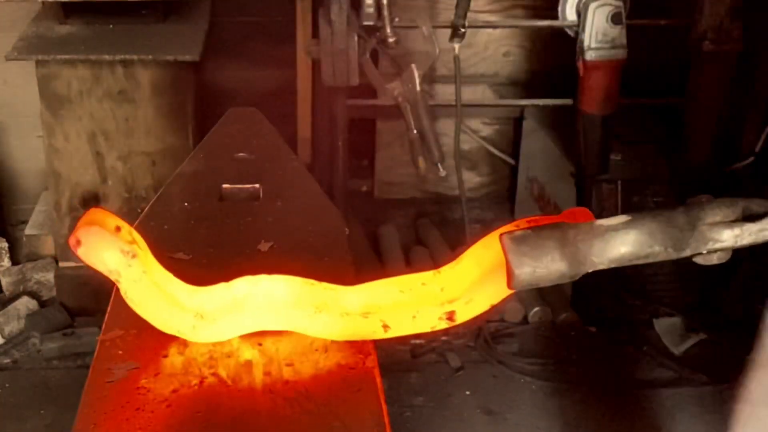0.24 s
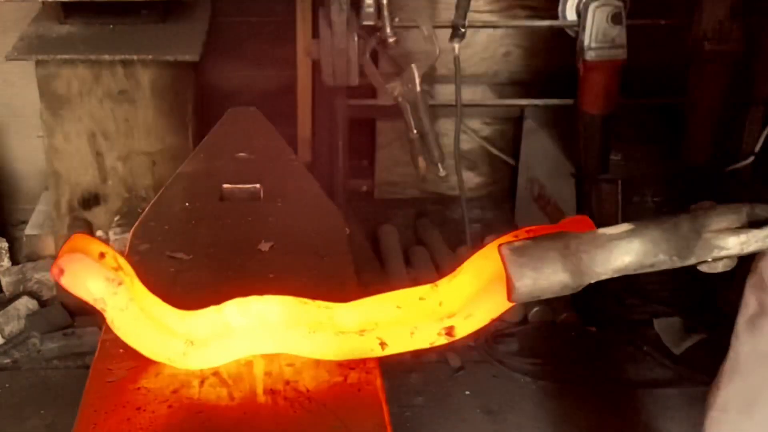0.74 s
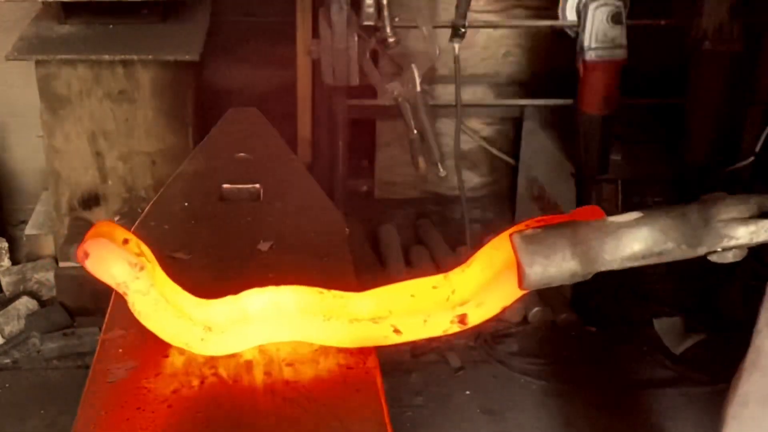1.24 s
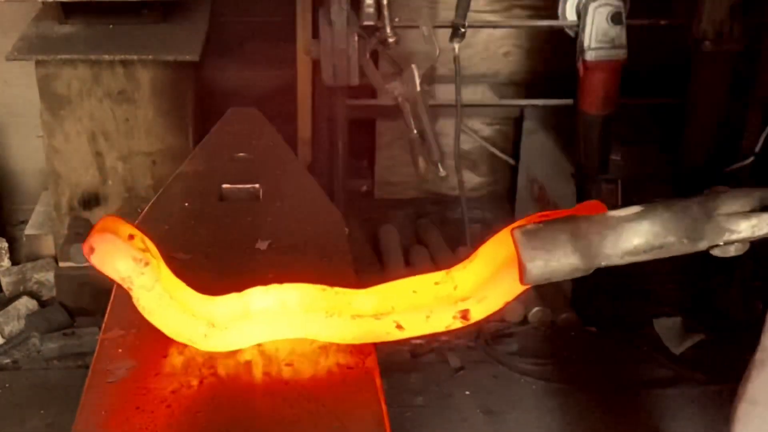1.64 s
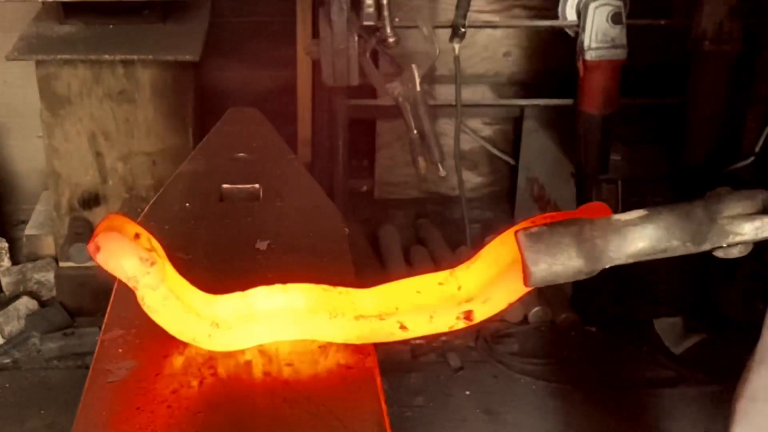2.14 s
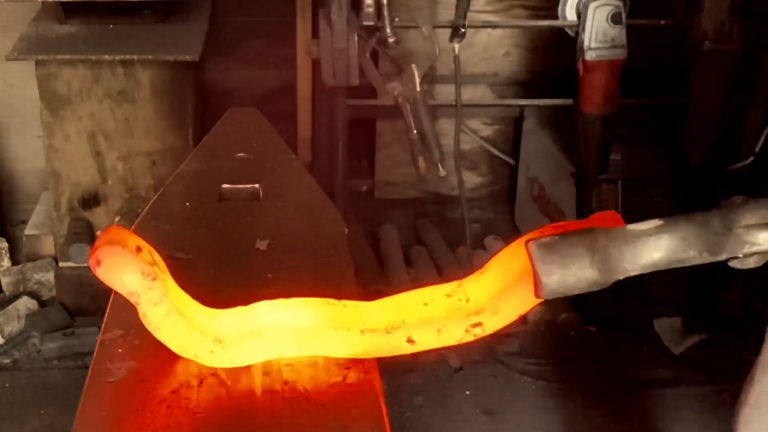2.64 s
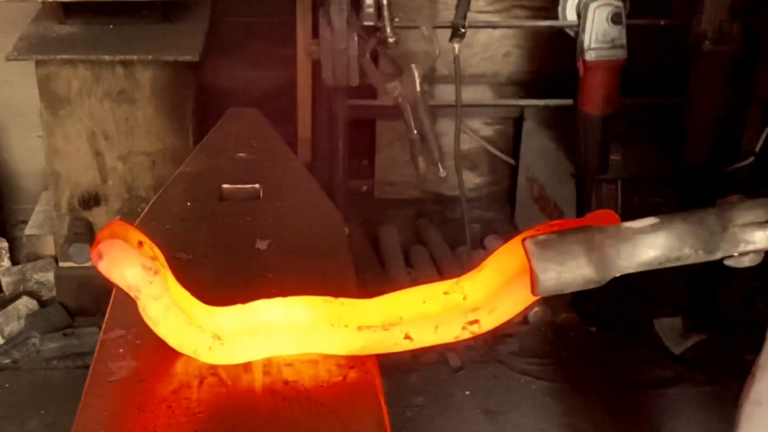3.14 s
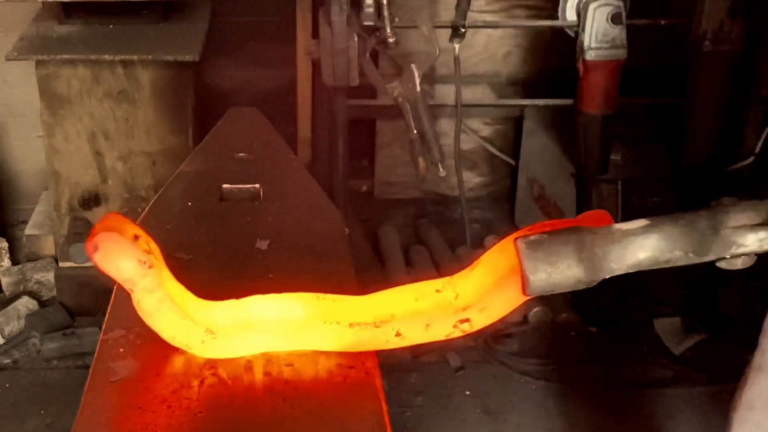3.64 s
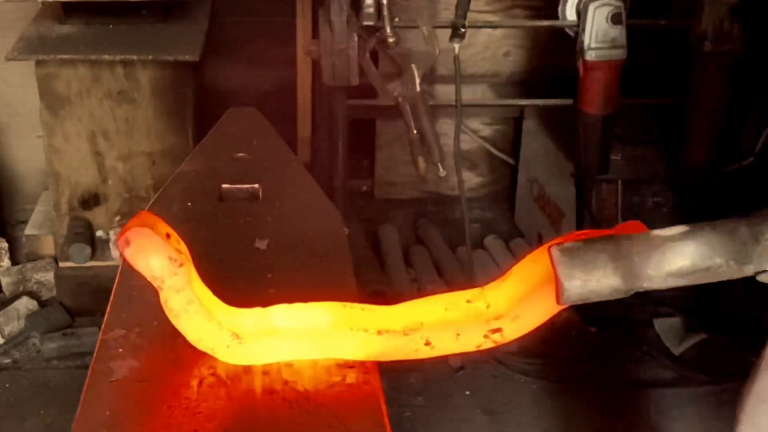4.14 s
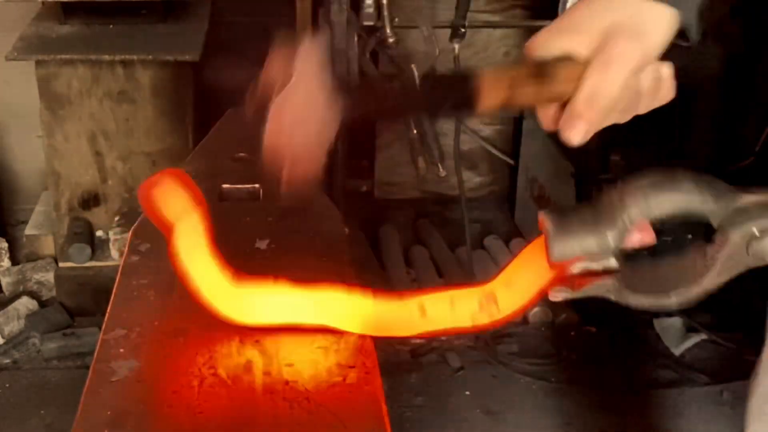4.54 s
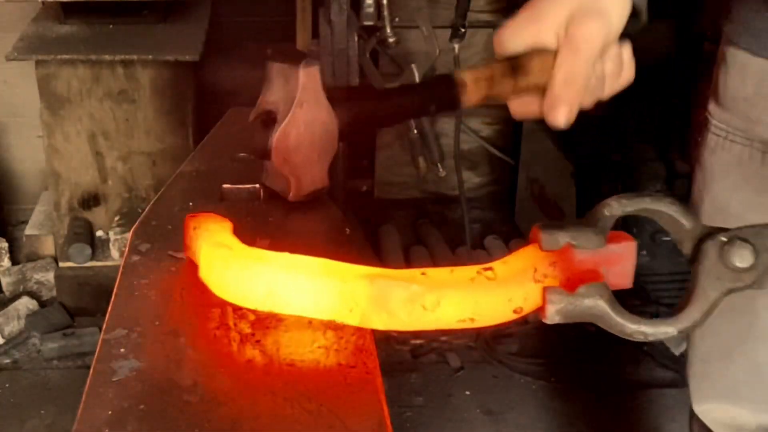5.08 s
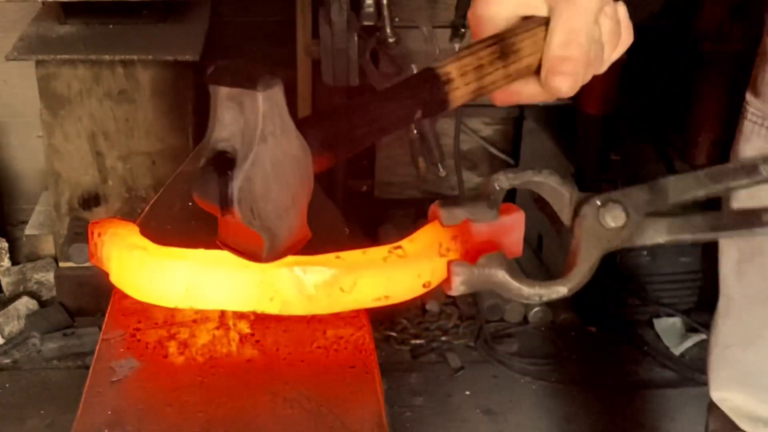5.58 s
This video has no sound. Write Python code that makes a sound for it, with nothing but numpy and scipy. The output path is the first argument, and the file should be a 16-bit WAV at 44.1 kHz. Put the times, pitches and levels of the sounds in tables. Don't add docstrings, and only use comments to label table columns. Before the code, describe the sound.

A low, uneven forge blower roar with soft airy hiss runs throughout a small, briefly echoing workshop, picked up close in stereo. A hammer strikes a hot iron bar on an anvil at about 0.27, 0.78, 1.29, 1.81, 2.31, 2.83, 3.36 and 3.88 s. The first is softer; the others are hard, bright cracks with a dull bar clank and a short ring around 2.3 kHz. The fourth thumps deepest, the fifth has the clearest anvil note, the sixth and eighth are bright with almost no thump. A light tick follows each by roughly 0.1 s. The blower dips after blows and recovers. From 4.39 to 4.8 s the hammer bounces on bare steel, clinking, loudest on the second bounce, then quicker, duller and fainter. A very faint short scrape comes near 5.15 s, small ticks at 5.45 and 5.8 s, with just the blower between.

```python
import sys
import numpy as np
from scipy import signal
from scipy.fft import rfft, irfft, next_fast_len
from scipy.io import wavfile
from scipy.ndimage import uniform_filter1d, map_coordinates

SR = 44100
rng = np.random.default_rng(int(sys.argv[2]) if len(sys.argv) > 2 else 0)


def decibels_to_gain(level_db):
    exponent = np.asarray(level_db, float) / 20
    return 10 ** exponent


def int16_out(signal):
    q = np.round(np.clip(np.atleast_2d(signal).T, -1, 1) * 32767)
    wavfile.write(sys.argv[1], SR, q.astype(np.int16))


N = 256220

# (time [s], peak [dB], stand thump [dB], bright ring [dB], anvil note [dB])
BLOWS = [
    (0.2671, -15, -54, -40, -17.5),
    (0.7832, -5.5, -32, -3, -16),
    (1.294, -6, -18.5, -7, -14.5),
    (1.814, -5.5, -10.5, -2, -12.5),
    (2.3121, -8, -19.5, -7.5, -10.5),
    (2.8266, -5, -60, -3, -15.5),
    (3.3557, -4.5, -16, -3, -11.5),
    (3.8819, -5, -75, -2, -16.5),
]
# (time [s], peak [dB], bright ring [dB], upper tick [dB])
DROPS = [(0.3755, -20, -21, -3), (0.4042, -28, -36, -34), (0.8668, -21.5, -39, -0.5), (1.3822, -19, -15, 4),
         (1.907, -20.5, -62, -7), (2.382, -27.5, -25, 10), (2.906, -28, -34, -3), (3.4566, -22, -36, -5),
         (3.9708, -27, -30, -15), (5.408, -60, -40, 17), (5.453, -32.5, -41, -4.5),
         (5.8054, -39, -29.5, -16)]
# (time [s], peak [dB])
BOUNCES = [
    (4.3924, -12),
    (4.4984, -9.5),
    (4.5721, -12.5),
    (4.6273, -14),
    (4.6748, -16),
    (4.7161, -21.5),
    (4.7476, -25.5),
    (4.7774, -31),
    (4.8058, -51),
]
# (frequency [Hz], level [dB], time to fall 60 dB [s])
ANVIL_NOTE = [(2255, 0, .19), (2328, -4, .15)]
# (frequency [Hz], level [dB], time to fall 60 dB [s])
ANVIL_OVERTONES = [(1566, 0, .12), (1920, -2, .08), (2650, 3, .08), (3090, -2, .15), (4107, -1, .14),
                   (5080, -1, .18), (5620, -4, .14), (6105, 0, .18), (6685, -1, .17), (8020, -3, .13)]
# (frequency [Hz], level [dB], time to fall 60 dB [s])
HAMMER_HEAD = [(8823, 0, .11), (9090, -8, .09), (11700, -17, .08), (12752, -4, .12), (13300, -19, .08),
               (14550, -16, .08)]
# (frequency [Hz], level [dB], time to fall 60 dB [s])
IRON_BAR = [(540, -6, .02), (720, -7, .02), (960, -3, .02), (1040, 0, .025), (1130, -4, .02)]
# (frequency [Hz], level [dB], time to fall 60 dB [s])
FACE_CLICK = [(5340, -4, 0.0062), (7320, 0.5, 0.0076), (11470, -1, 0.0036), (15400, -24, .005)]
# (frequency [Hz], level [dB], time to fall 60 dB [s])
HORN = [(5090, 0, .8), (5160, -3, .5), (3600, -4, .7)]
# (frequency [Hz], level [dB per Hz])
CRACK = [(250, -24), (600, -4.5), (1100, -4.5), (1800, -2), (3000, -2.5), (4500, -10), (6500, -4.5),
         (8800, -7.5), (11000, -12.5), (13000, -14), (15600, -22), (16600, -45)]
# (frequency [Hz], level [dB per Hz])
TICK = [(500, -16.5), (1000, -12.5), (1700, -8), (3000, -10.5), (4200, -8), (5300, -7), (6800, -9.5),
        (8800, -15), (11000, -18.5), (13000, -23), (15600, -35), (16600, -55)]
# (frequency [Hz], side over mid [dB])
ANVIL_WIDTH = [(200, 1), (500, 2), (770, 0.5), (1170, -2), (2700, 0), (4200, 1), (8000, -2)]
# (frequency [Hz], time to fall 60 dB [s])
WORKSHOP = [(200, 0.4), (1000, 0.21), (3000, 0.17), (8000, 0.19), (14000, 0.12)]
# (time [s], level [dB], length [s])
SWAYS = [(0.51, -54, 0.14), (0.687, -42, .1), (1.481, -34, 0.069), (1.984, -33, .16), (5.32, -42, 0.23)]
# (frequency [Hz], level [dB per Hz])
ROAR = [(15, -69.5), (25, -33), (48, -16.5), (151, -8.5), (189, -13), (232, -1), (285, -15.5), (316, -5),
        (422, -16), (555, -7), (659, -21.5), (718, -14), (1500, -47), (1950, -81), (3300, -120)]
# (frequency [Hz], level [dB per Hz])
HISS = [(700, -9.5), (1200, -4), (1800, -12.5), (2310, -2), (2970, -7), (3650, -15.5), (3800, -16),
        (7700, -17.5), (9300, -20.5), (11000, -26.5), (13000, -28.5), (15700, -28), (15850, -68)]
# (frequency [Hz], width [Hz], boost [dB])
DUCT = [(239, 8.7, 4.5), (356.3, 20, 5.5), (394, 26.5, 10.5), (488, 48, 6.5), (537.5, 9.2, 10.5),
        (2264, 30, 11), (2420, 130, -4), (2980, 88, 10.5), (3185, 16.5, 15), (3416, 31, 14.5),
        (3576, 16, 18.5)]
# (time [s], level [dB])
ROAR_LEVEL = [(0.0, -36.5), (0.39, -37.5), (0.58, -36), (0.97, -38.5), (1.16, -33.5), (1.33, -40.5),
              (1.7, -34.5), (1.83, -36.5), (2.22, -36), (3.03, -39.5), (3.15, -38.5), (3.48, -38.5),
              (4.53, -36), (5.47, -37.5), (5.81, -34.5)]
# (frequency [Hz], likeness [-1 to 1])
LIKENESS = [(40, 1), (92, 0.39), (210, 0.86), (330, 0.57), (500, -0.18), (770, -0.24), (1170, -0.034),
            (2700, -0.043), (8000, 0.021)]


def anvil():
    pre = SR // 40
    t = (np.arange(SR * 3 // 5) - pre) / SR
    short = t[:SR // 4]
    near, far = np.zeros((2, 2, N + SR))

    for s, db, thump_db, bright_db, note_db in BLOWS:
        start = round(s * SR) - pre
        near[:, start:start + len(short)] += decibels_to_gain(db) * blow(short, db, thump_db, bright_db, note_db)
        stand_and_horn = np.array([decibels_to_gain(thump_db + 16) * thump(t), decibels_to_gain(-37.5) * ring(HORN, t, 1.6)])
        far[:, start:start + len(t)] += decibels_to_gain(db) * stand_and_horn

    for s, db, bright_db, upper_db in DROPS:
        start = round(s * SR) - pre
        sound = tap(short, bright_db, upper_db, ring_db=-3.5, clang_db=-6.5, snap_db=17.5, t60=0.019,
                    overtones_db=-19)
        near[:, start:start + len(short)] += decibels_to_gain(db) * sound

    for k, (s, db) in enumerate(BOUNCES):
        start = round(s * SR) - pre
        sound = tap(short, -13 - 3.5 * k, -4 - 2 * k, ring_db=2.5, clang_db=-0.3, snap_db=7, t60=0.031,
                    overtones_db=-16)
        near[:, start:start + len(short)] += decibels_to_gain(db) * sound

    near, (stand, horn) = near[:, :N], far[:, :N]
    mid = near[0] + stand + 0.22 * horn
    side = filtered(near[1], lambda hz: 1j * decibels_to_gain(along(ANVIL_WIDTH, hz))) + 0.29 * stand + horn
    return np.array([mid + side, mid - side])


def blow(t, db, thump_db, bright_db, note_db):
    body_lag_s, body_below_hz = 0.00144, 2860
    snap_db = 17 + 0.11 * thump_db - 0.011 * bright_db
    clank_db = -7.5 - db + 0.079 * bright_db + 0.033 * thump_db + 0.46 * note_db
    upper_db = -0.66 - 0.24 * bright_db
    top_db = 4.5 - 0.96 * (snap_db - 15) + 0.45 * bright_db
    faint_lead_db = -17.5 - 0.37 * db

    note = ring(ANVIL_NOTE, t - body_lag_s, 0) + decibels_to_gain(-15) * ring(ANVIL_OVERTONES, t, 1.0)
    steel = decibels_to_gain(note_db) * note
    steel += decibels_to_gain(bright_db - 9.0) * ring(HAMMER_HEAD, t, 0.22)
    steel += decibels_to_gain(clank_db) * ring(IRON_BAR, t - body_lag_s, 0.16)
    steel += decibels_to_gain(-4.5) * ring(FACE_CLICK, t, 1.2)

    def colour(hz):
        late = np.exp(-2j * np.pi * body_lag_s * body_below_hz * np.arctan(hz / body_below_hz))
        return shelf(hz, 3100, upper_db) * shelf(hz, 9500, top_db) * late

    crack = decibels_to_gain(-9.5) * burst(CRACK, t, 0.019, snap_db, clang_db=-16.5, lead_db=faint_lead_db)
    return heard(filtered(crack, colour), steel, wet_db=4.5)


def tap(t, bright_db, upper_db, ring_db, clang_db, snap_db, t60, overtones_db):
    note = ring(ANVIL_NOTE, t, 0.76) + decibels_to_gain(overtones_db) * ring(ANVIL_OVERTONES, t, 0.69)
    steel = decibels_to_gain(ring_db - 19.5) * note
    steel += decibels_to_gain(bright_db - 4) * ring(HAMMER_HEAD, t, 0.86)
    steel += decibels_to_gain(-26 + upper_db) * ring(FACE_CLICK, t, 1.5)
    tick = decibels_to_gain(-4.5) * burst(TICK, t, t60, snap_db, clang_db - 13.5, lead_db=-27)
    tick = filtered(tick, lambda hz: shelf(hz, 5800, upper_db))
    return heard(tick, steel, wet_db=clang_db)


def ring(modes, t, scatter_db):
    hz, db, t60 = np.transpose(modes)[:, :, None]
    chance = rng.random((3, len(modes), 1))
    flutter = 1 + .4 * np.sin(2 * np.pi * ((60 + 120 * chance[1]) * t + chance[2]))
    level = decibels_to_gain(db + scatter_db * (8.6 * chance[0] - 6) - 60 * t / t60)
    return np.sum(level * flutter * np.sin(2 * np.pi * hz * t), 0) * (t > 0)


def burst(spectrum, t, t60, snap_db, clang_db, lead_db):
    noise = rng.standard_normal(len(t))
    dull = uniform_filter1d(uniform_filter1d(noise, size=3), size=3)
    lead_in = 1.15 * dull * decibels_to_gain(lead_db - 33 * (t / 0.019) ** 4)
    after = noise * (decibels_to_gain(-60 * t / t60) + decibels_to_gain(clang_db - 60 * t / 0.16))
    snap = decibels_to_gain(snap_db) * (t == 0)
    return filtered(np.where(t > 0, after, lead_in) + snap, lambda hz: unit(decibels_to_gain(along(spectrum, hz))))


def thump(t):
    t = np.maximum(t - .003, 0)
    cycles = 72 * t + .6 * (1 - np.exp(-t / .003))
    return np.sin(2 * np.pi * cycles) * decibels_to_gain(-60 * t / 0.055) * (1 - np.exp(-t / 0.00176))


def heard(x, steel, wet_db):
    hz, t, z = signal.stft(rng.standard_normal((2, SR // 4)), SR, nperseg=256)
    tail = signal.istft(z * decibels_to_gain(-60 * t / along(WORKSHOP, hz)[:, None]), SR, nperseg=256)[1]
    tail = tail / np.linalg.norm(tail[0])
    sent = np.pad(x + steel / 10, (90, 0))
    wet = signal.fftconvolve(sent[None], tail, axes=1)[:, :len(x)]
    return (x + steel) * decibels_to_gain([[0], [-3]]) + decibels_to_gain(wet_db) * wet


def scrape():
    start_s, hold_s, rise_db_per_s, fall_db_per_s = 5.134, .062, 190, 540
    t = np.arange(N) / SR - start_s
    swell_db = np.minimum(0, rise_db_per_s * t)
    stop_db = np.maximum(0, fall_db_per_s * (t - hold_s))
    level_db = -50 + swell_db - stop_db
    return decibels_to_gain(level_db + 1.1 * wobble(90)) * rush(lambda hz: decibels_to_gain(along(TICK, hz)), patchy_db=2)


def tripod():
    t = np.arange(N) / SR
    swell = sum(decibels_to_gain(db) * np.exp(-(2 * (t - s) / length) ** 4) for s, db, length in SWAYS)
    return swell * np.sin(2 * np.pi * 52 * t)


def blower():
    def duct(hz):
        return decibels_to_gain(sum(db / (1 + (2 * (hz - c) / w) ** 2) for c, w, db in DUCT))

    level_db = np.interp(np.arange(N) / SR, *np.transpose(ROAR_LEVEL))
    roar = rush(lambda hz: decibels_to_gain(along(ROAR, hz)) * duct(hz), patchy_db=1.54)
    roar = decibels_to_gain(level_db + 8.5 + 0.43 * wobble(11)) * roar
    hiss = rush(lambda hz: decibels_to_gain(along(HISS, hz)) * duct(hz), patchy_db=0.9)
    hiss = decibels_to_gain(-48.5 + 0.83 * wobble(3.76)) * hiss
    return roar + hiss


def rush(gain, patchy_db):
    z = signal.stft(rng.standard_normal((2, N)), nperseg=512)[2]
    field = uniform_filter1d(rng.standard_normal(z.shape[1:]), 4, 0)
    field = uniform_filter1d(field, 10, 1)
    pair = signal.istft(z * decibels_to_gain(patchy_db * unit(field)), nperseg=512)[1][:, :N]

    def share(hz):
        turn = np.arccos(np.clip(along(LIKENESS, hz), -1, 1)) / 2
        return gain(hz) * [np.cos(turn), np.sin(turn)]

    mid, side = filtered(pair, share)
    return unit(np.array([mid + side, mid - side]))


def wobble(rate):
    knots = rng.standard_normal(int(N * rate / SR) + 4)
    return map_coordinates(knots, [np.arange(N) * rate / SR])


def filtered(x, response):
    m = next_fast_len(x.shape[-1] + 4096)
    return irfft(rfft(x, m) * response(np.fft.rfftfreq(m, 1 / SR)), m)[..., :x.shape[-1]]


def shelf(hz, edge_hz, db):
    return decibels_to_gain(db / (1 + (edge_hz / (hz + 1)) ** 6))


def along(points, hz):
    f, v = np.transpose(points)
    return np.interp(np.log(hz + 1), np.log(f + 1), v)


def unit(x):
    return x / np.sqrt(np.mean(x ** 2) + 1e-20)


def scene():
    return anvil() + scrape() + tripod() + blower()


def treble(x):
    def over(hz, edge_hz):
        return .5 + .5 * np.tanh((hz - edge_hz) / 60)

    def whole(hz):
        return (over(hz, 8300) - .4 * over(hz, 13900) - .6 * over(hz, 16500)) * np.array([[.7], [.7j]])

    def thinned(hz):
        turn = np.pi / 2 * (hz - 7000) / 2500
        share = over(hz, 8300) * np.abs([np.cos(turn), np.sin(turn)]) * [[1], [1j]]
        mid_kept = 1 - over(hz, 9000) + over(hz, 10250) - over(hz, 13750)
        side_kept = 1 - over(hz, 11000) + over(hz, 12600) - over(hz, 15750)
        return share * [mid_kept, side_kept]

    left = x[[0, 0]]
    full, thin = filtered(left, whole), filtered(left, thinned)
    power = np.sum(full ** 2, 0)
    quick, slow = (np.abs(uniform_filter1d(power, size)) for size in (128, 2048))
    jump = (quick > 2.7 * slow) * (quick > 1.6 * np.roll(quick, 200))
    attack = uniform_filter1d(1. * jump, size=96)
    mid, side = thin + attack * (full - thin)
    return filtered(x, lambda hz: 1 - over(hz, 8300)) + np.array([mid + side, mid - side])


def roll_off(x):
    return signal.sosfilt(signal.butter(12, 16650, fs=SR, output="sos"), x)


def record(dry):
    dry = signal.lfilter(*signal.butter(2, 28, "high", fs=SR), dry)
    power = np.mean(dry ** 2, 0)
    for lag_s in (0.06, 0.025):
        hold = np.exp(-1 / (lag_s * SR))
        power = signal.lfilter([1 - hold], [1, -hold], power)
    ducked = dry * (1 + power / decibels_to_gain(-24) ** 2) ** -.35
    limited = ducked / (1 + ducked ** 4) ** .25
    return roll_off(treble(limited))


dry = scene()
out = record(dry)
int16_out(out)
```